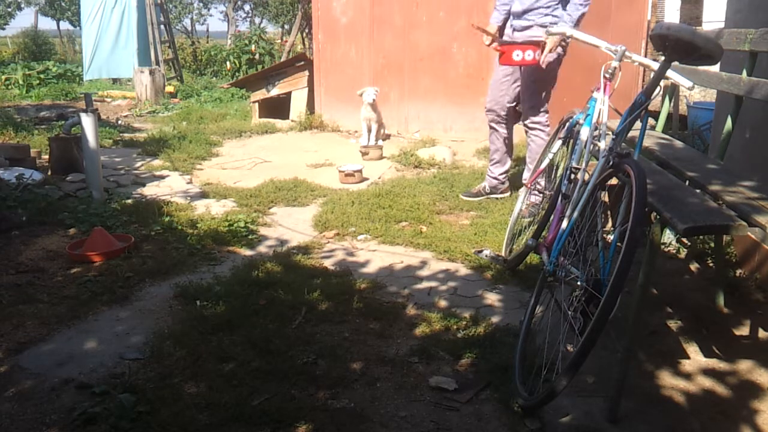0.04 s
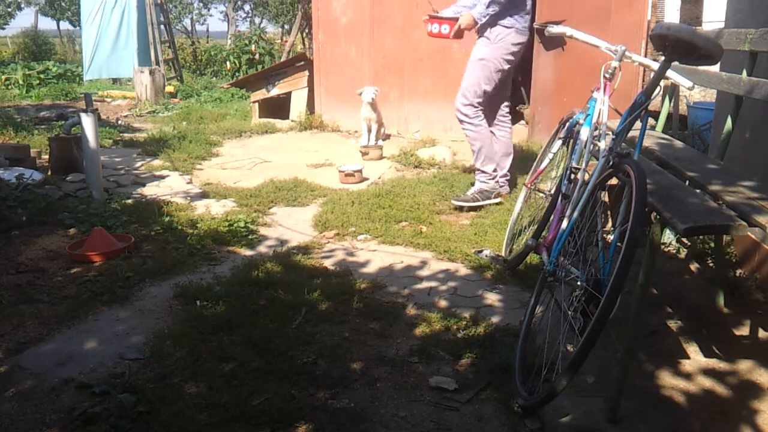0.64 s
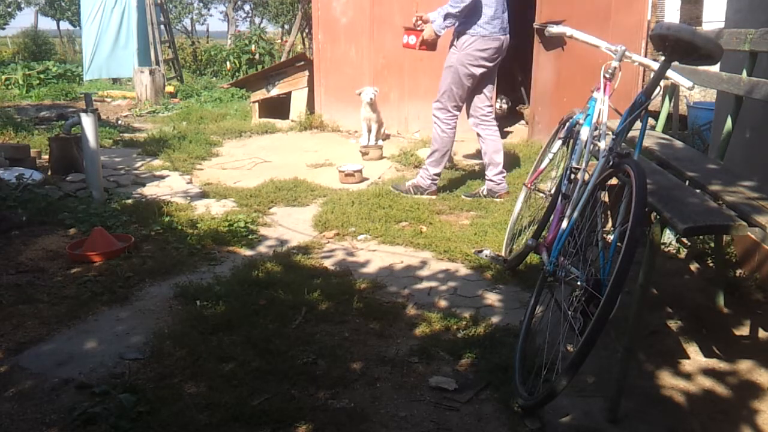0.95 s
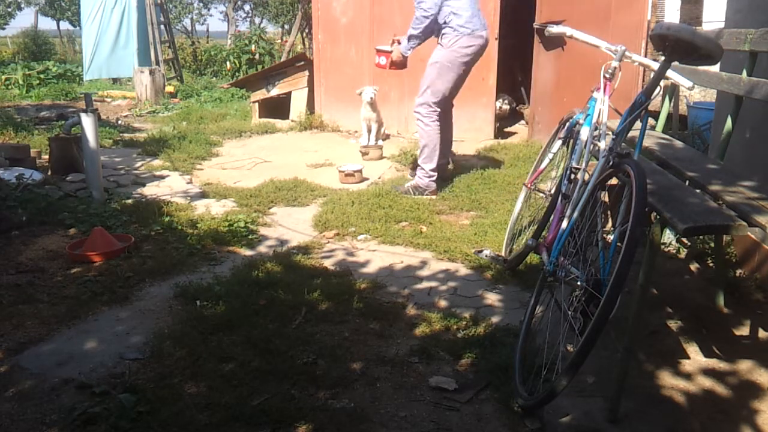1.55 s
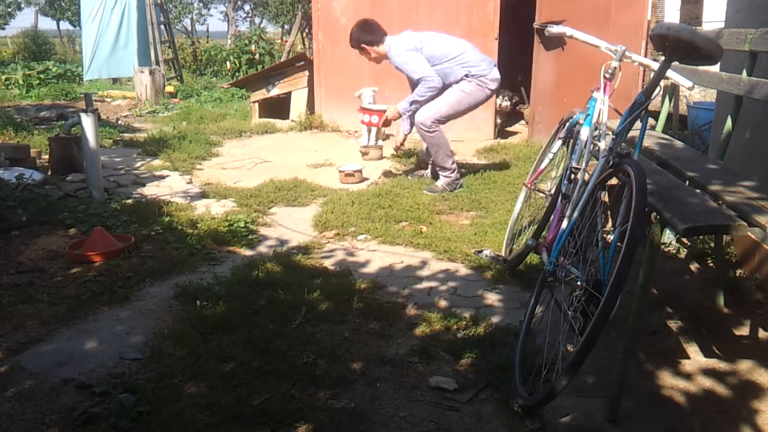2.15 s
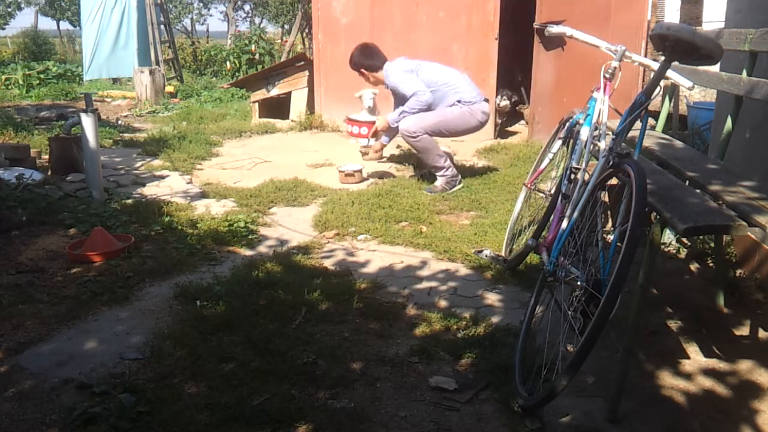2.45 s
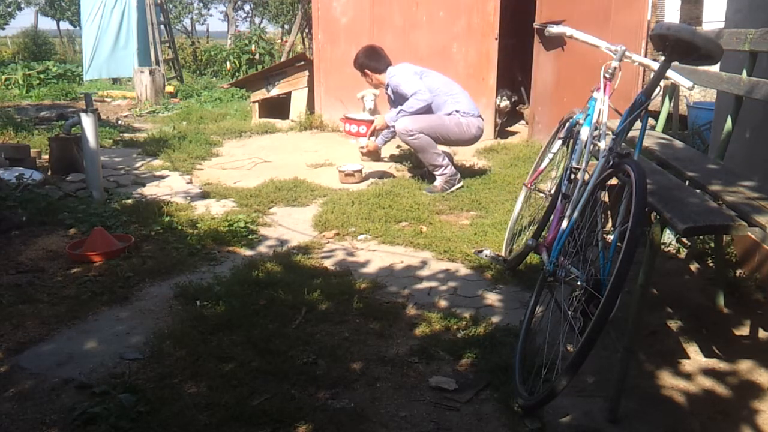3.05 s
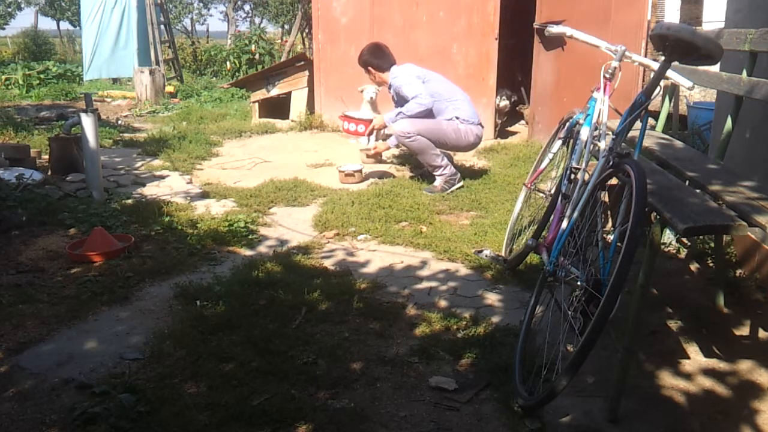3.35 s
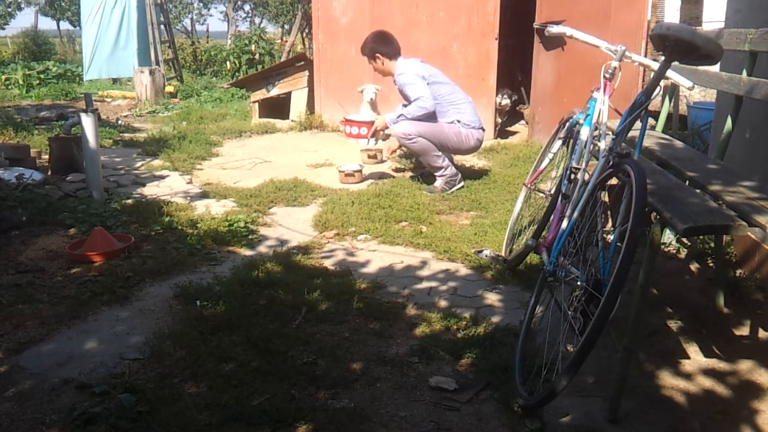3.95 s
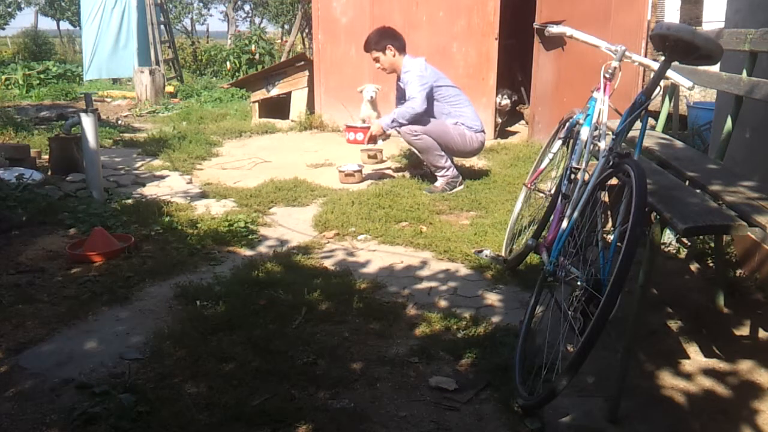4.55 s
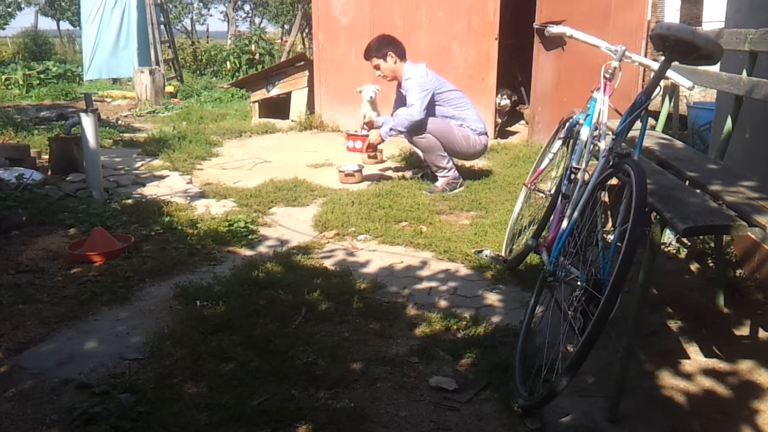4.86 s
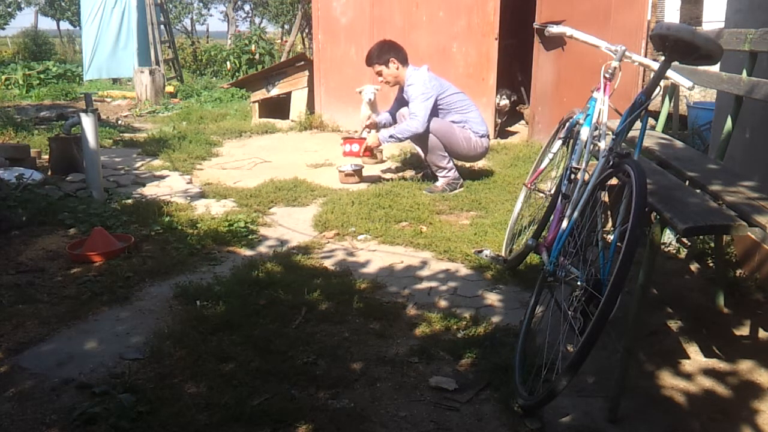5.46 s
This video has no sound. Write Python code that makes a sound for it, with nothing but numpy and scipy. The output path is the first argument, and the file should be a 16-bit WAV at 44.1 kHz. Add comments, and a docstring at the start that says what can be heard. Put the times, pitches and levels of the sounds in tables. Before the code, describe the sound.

An even outdoor hiss fills a quiet yard throughout, with the faint drone of far traffic behind it. At about 1.4 seconds dry pet food clicks a couple of times in a plastic tub, then slides softly until just after 2 seconds; a distant bird gives one thin chirp near 1.7 seconds. At 3 seconds comes the loudest event: the pellets pour into a small bowl for about half a second, a dense patter with hard, crisp knocks that briefly ring the bowl and soft thuds as clumps land on the heap. It is heard from a few metres away, with a slight reflection from a shed wall. From about 4.1 seconds pellets shift quietly in the tub again, and the bird adds two faint high notes. One last small rustle comes near 5 seconds, leaving hiss and traffic until the end, shortly before 6 seconds.

```python
"""Dry pet food is tipped from a plastic tub into a small bowl on the ground of a yard, a few metres away.
Far traffic drones behind an even hiss throughout. From 1.4 s pellets click and slide in the carried tub,
and a far bird chirps. At 3 s the food pours for half a second: a dense patter with hard knocks that ring
the bowl and soft thuds on the heap, thrown back by a shed wall. After 4 s pellets shift in the tub again
and the bird adds two faint notes."""
import sys
import numpy as np
from scipy import signal
from scipy.fft import rfft, irfft
from scipy.io import wavfile

SR = 44100
rng = np.random.default_rng(int(sys.argv[2]) if len(sys.argv) > 2 else 0)


def bounce(signal):
    """Save signal as a 16-bit WAV file at the path given by the first command-line argument."""
    frames = np.transpose(np.atleast_2d(signal))
    limited = np.clip(frames, -1, 1)
    pcm = np.round(limited * 32767).astype(np.int16)
    wavfile.write(sys.argv[1], SR, pcm)


N = 251370
TIME = np.arange(N) / SR
HZ = np.fft.rfftfreq(N, 1 / SR)
RING_TIME = np.arange(SR // 6) / SR

# tone colour of a pellet's crack: f/Hz, level/dB
CRACK_EQ = [(30, -42), (150, -9), (300, -8), (600, 9.5), (1000, 2), (1600, -1.5), (2600, -1.5), (3600, 5),
            (4600, -3), (5700, -5), (8000, -0.5), (10000, -6), (15000, -9.5)]
# modes of the bowl's wall and of its rim: f/Hz, level/dB, t60/s
WALL_MODES = [(1217, -10.5, 0.063), (1357, -17, 0.17), (1496, -4, 0.058), (1549, -1, 0.03),
              (1710, -13, 0.051), (2126, -16.5, 0.14)]
RIM_MODES = [(3380, 2.5, 0.032), (3425, 1, 0.024), (3320, -5, 0.024), (3650, -30, 0.033), (3830, -31, .04),
             (4120, -1.5, 0.017), (4600, 4, 0.025), (6500, -10, 0.051), (6740, -11, 0.062)]


def amp(db):
    """Decibels to gain."""
    return 10 ** (np.asarray(db) / 20)


def unit(x):
    """Scales to rms 1."""
    return x / np.sqrt(np.mean(x ** 2) + 1e-20)


def curve(points, hz):
    """Interpolates breakpoints on a log-frequency axis."""
    f, value = np.transpose(points)
    return np.interp(np.log(hz + 1), np.log(f + 1), value)


def add(mix, s, sound):
    """Mixes a sound into both channels at s seconds."""
    part = mix[:, max(round(s * SR), 0):][:, :sound.shape[-1]]
    part += sound[..., :part.shape[1]]


def colour(x, eq, size=1024):
    """Minimum-phase EQ of unit energy, so that attacks stay sharp."""
    log_gain = np.log(amp(curve(eq, abs(np.fft.fftfreq(size, 1 / SR)))))
    response = np.exp(np.conj(signal.hilbert(log_gain)))
    taps = np.fft.ifft(response).real[:size // 2]
    return signal.fftconvolve(x, taps / np.linalg.norm(taps))[:len(x)]


def drift(rate_hz):
    """Slow random modulation of rms 1."""
    return unit(irfft(rfft(rng.standard_normal(N)) * np.exp(-(HZ / rate_hz) ** 2), N))


def swells(rows):
    """Gain envelope of bell-shaped swells: t/s, half length/s, level/dB."""
    return sum(amp(db) * np.exp(-((TIME - s) / half) ** 2 / 2) for s, half, db in rows)


def humps(rows):
    """A spectrum of resonant peaks."""
    return sum(amp(db) / (1 + ((HZ - hz) / width) ** 2) for hz, width, db in rows)


def burst(life_s):
    """A rough grain chatters on a surface: quick attack, then decay."""
    envelope = RING_TIME / life_s * np.exp(1 - RING_TIME / life_s)
    chatter = envelope * rng.standard_normal(len(RING_TIME))
    return chatter * np.linalg.norm(envelope) / np.linalg.norm(chatter)


def ring(modes, rise_s, detune, spread):
    """Decaying modes; the spot struck shifts their pitch and their phase between left and right."""
    out = np.zeros((2, len(RING_TIME)))
    for hz, db, t60 in modes:
        start, side, shift = rng.uniform(-1, 1, 3)
        phase = start + spread * np.array([[side], [-side]])
        cycles = hz * (1 + detune * shift) * RING_TIME + phase
        out += np.sin(2 * np.pi * cycles) * amp(db - 60 * RING_TIME / t60)
    return out * (1 - np.exp(-(RING_TIME / rise_s) ** 2))


def wash(spectrum, top_hz=14650):
    """A wide stereo bed of diffuse noise with the given spectrum."""
    # likeness of left and right: f/Hz, correlation/0-1
    likeness = [(30, 0), (120, 0.29), (400, 0.32), (800, 0), (1500, 0), (4000, 0.07), (14000, 0)]
    # balance: f/Hz, left over right/dB
    balance = [(30, 5), (80, 5), (170, 1), (400, -2), (1500, -2), (14000, -0.5)]
    left, other = rfft(rng.standard_normal((2, N)))
    same = np.clip(curve(likeness, HZ), 0, 1)
    right = same * left + np.sqrt(1 - same ** 2) * other
    side_db = curve(balance, HZ) / 2
    pair = np.array([left * amp(side_db), right * amp(-side_db)])
    return unit(irfft(pair * spectrum * (HZ < top_hz), N))


def yard(x, near_db, far_db, near_t60=0.063, far_t60=0.46, shadow_hz=900, grass_hz=9000):
    """Direct sound, early scatter from ground and shed wall, and a faint tail."""
    t = np.arange(SR // 2) / SR
    taps = rng.choice([-1., 1.], (2, len(t))) * (rng.random((2, len(t))) < 5000 / SR)
    near = taps * amp(-60 * t / near_t60) * (t > .001)
    far = taps[::-1] * amp(-60 * t / far_t60) * (t > .018)
    near, far = (rfft(e / np.linalg.norm(e, axis=1, keepdims=True), N) for e in (near, far))
    scatter = (HZ / np.hypot(HZ, shadow_hz)) ** 2  # long waves pass small obstacles without scattering
    damping = grass_hz / np.hypot(HZ, grass_hz)  # grass swallows the treble of the reflections
    echoes = damping * (amp(near_db) * scatter * near + amp(far_db) * far)
    # just right of centre: the left side is a touch later and softer
    direct = np.array([np.exp(-2j * np.pi * HZ * .00002), np.ones(len(HZ))])
    return irfft(rfft(x) * (direct + echoes), N) * amp([[-1], [1]])


def air(level_db=-55.5):
    """The even hiss of outdoor air."""
    # tone colour of the air: f/Hz, level/dB
    air_eq = [(15, -40), (25, -36), (43, -11.5), (65, -10.5), (90, -9), (120, -7), (160, -1.5), (320, -11),
              (430, -10.5), (650, -14), (900, -13), (1500, -17.5), (3000, -22), (4300, -23.5), (5800, -27),
              (8000, -25.5), (14500, -26)]
    return wash(amp(curve(air_eq, HZ))) * amp(level_db - 0.07 * drift(11.0))


def traffic_rumble(hold_db=-62.5, full_s=1.73, rise_db_per_s=8.5):
    """The low end of far traffic fades in, holds and swells once."""
    # resonances of the rumble: f/Hz, width/Hz, level/dB
    resonances = [(158, 32, 5), (136, 20, -16.5), (216.4, 6.2, -2)]
    # its swell: t/s, half length/s, level/dB
    swell = [(3.67, 0.089, -60.5)]
    build = amp(hold_db - rise_db_per_s * np.maximum(full_s - TIME, 0))
    return wash(humps(resonances)) * (build + swells(swell))


def tyre_roar(low_db=-69, high_db=-68, flutter_db=1.6):
    """Far tyres roar in two bands that swell as vehicles pass."""
    # resonances of the low and the high band: f/Hz, width/Hz, level/dB
    low_band = [(404, 39, -1.5), (580, 40, 6.5)]
    high_band = [(751, 64, -0.5), (886, 30, -4), (1160, 61, -9)]
    # pass-bys: t/s, half length/s, low band level/dB, high band level/dB
    passes = [(0, 0.15, -71, -69), (1.642, .38, -80, -63.5), (4.0, 0.28, -85, -74), (5.7, .8, -63.5, -64.5)]
    low_gain = amp(low_db) + swells([(s, half, db) for s, half, db, _ in passes])
    high_gain = amp(high_db) + swells([(s, half, db) for s, half, _, db in passes])
    roar = wash(humps(low_band)) * low_gain + wash(humps(high_band)) * high_gain
    return roar * amp(flutter_db * drift(6.1))


def engine(start_hz=85, climb_hz_per_s=3.8, waver=0.012, start_db=-65, fade_db_per_s=1.4, throb_db=1.5):
    """A far engine speeds up evenly: one wavering, throbbing note that fades and swells twice."""
    # swells of the note: t/s, half length/s, level/dB
    engine_swells = [(2.6, 0.3, -69), (5.0, .4, -71.5)]
    pitch_hz = (start_hz + climb_hz_per_s * TIME) * (1 + waver * drift(3.8))
    envelope = amp(start_db - fade_db_per_s * TIME) + swells(engine_swells)
    return np.sin(2 * np.pi * np.cumsum(pitch_hz) / SR) * envelope * amp(-throb_db * drift(7))


def bird(waver=0.0117):
    """A far bird sings a few thin, nearly pure notes."""
    # notes: t/s, half length/s, f/Hz, level/dB
    notes = [(1.736, 0.016, 4300, -67), (4.25, .04, 4500, -79), (4.38, .04, 4500, -74)]
    wobbly_time = np.cumsum(1 + waver * drift(58)) / SR
    return sum(swells([(s, half, db)]) * np.sin(2 * np.pi * hz * wobbly_time) for s, half, hz, db in notes)


def tub(grains_per_s=1500, slide_db=-6, skitter_db=-14):
    """Pellets slide and click in the plastic tub as it is carried and tilted."""
    # tone colour of the rustle: f/Hz, level/dB
    rustle_eq = [(100, 13), (500, 7.5), (1500, 5), (2500, 2), (4300, -0.5), (5800, -0.5), (7000, -1.5),
                 (8500, -3.5), (11000, -4), (15000, -8)]
    # slides: t/s, half length/s, relative level/dB
    slides = [(1.57, 0.052, -64), (1.85, 0.039, -56.5), (1.86, 0.22, -58.5), (4.16, 0.039, -57.5),
              (4.3, 0.14, -61), (5.054, 0.039, -62)]
    # clicks against the tub: t/s, level/dB
    clicks = [(1.361, -46.5), (1.371, -60), (1.533, -44), (1.541, -59), (1.549, -59)]
    # modes of the tub: f/Hz, level/dB, t60/s
    tub_modes = [(1670, -5, 0.031), (3880, -1.5, 0.024), (4670, -5.5, 0.036), (6950, -14, 0.1),
                 (8400, -5, .035)]
    ticks = (rng.random(N) < grains_per_s / SR) * rng.choice([-1, 1], N)
    grains = ticks * amp(-2 * np.minimum(rng.exponential(1, N), 3))
    rustle = unit(colour(grains, rustle_eq)) * swells(slides) * amp(slide_db)
    out = np.tile(rustle, (2, 1))
    for s, db in clicks:
        click = colour(burst(life_s=0.00064) + amp(skitter_db) * burst(life_s=0.015), rustle_eq)
        body = ring(tub_modes, rise_s=0.00028, detune=0.0079, spread=0.17)
        add(out, s, amp(db) * (click + body))
    return out


def slumps():
    """Whole clumps land on the heap with a soft thud."""
    # clumps: t/s, level/dB
    clumps = [(3.037, -31), (3.119, -51), (3.285, -32), (3.384, -34.5), (3.481, -41)]
    # dull modes of the heap: f/Hz, level/dB, t60/s
    heap_modes = [(245, -9.5, 0.059), (362, -5.5, 0.056), (451, 5, 0.036)]
    out = np.zeros((2, N))
    for s, db in clumps:
        add(out, s, amp(db) * ring(heap_modes, rise_s=0.0039, detune=0.062, spread=0.068))
    return out


def floor_modes(pitch_hz):
    """The bowl's floor, tuned to the pitch that the load of food gives it."""
    # modes of the floor: multiple of the pitch, level/dB, t60/s
    partials = [(1, -1.5, 0.052), (.96, -16.5, 0.11), (.55, -23, 0.019), (.77, -12.5, 0.032),
                (1.3, -6, 0.017)]
    return [(pitch_hz * multiple, db, t60) for multiple, db, t60 in partials]


def floor_pitch(s, base_hz=568, lift_hz=68, thick_s=3.19, half_s=0.087):
    """The bowl's floor rings higher in the thick of the pour."""
    return base_hz + lift_hz * np.exp(-((s - thick_s) / half_s) ** 2 / 2)


def flow(start_s, stop_s, hold_db=-42.5, attack_db_per_s=441, release_db_per_s=309):
    """Envelope of the stream: quick attack, a hold with a few surges, slower release."""
    # surges of pellets: t/s, half length/s, level/dB
    surges = [(3.025, 0.033, -43.5), (3.11, 0.0074, -39.5), (3.246, 0.019, -31.5), (3.362, 0.021, -40),
              (3.485, 0.012, -54)]
    early, late = np.maximum(start_s - TIME, 0), np.maximum(TIME - stop_s, 0)
    return amp(hold_db - attack_db_per_s * early - release_db_per_s * late) + swells(surges)


def patter(start_s=2.978, stop_s=3.512, pellets_per_s=1000, pitches=30, spread_db=5.5, trim_db=-7):
    """A stream of small pellets of many pitches lands on the heap and on different spots of the bowl."""
    out = np.zeros((2, N))
    lead_s, tail_s = .06, .12  # room for the attack and the release
    length = round((stop_s - start_s + lead_s + tail_s) * SR)
    for pellet_hz in np.geomspace(1800, 12500, pitches):
        lands = rng.random(SR)[:length] < pellets_per_s / pitches / SR
        size = np.minimum(rng.exponential(1, SR), 3)[:length]
        landings = lands * amp(spread_db * size)
        ping_db = -8 - 10 * np.log10(1 + (pellet_hz / 7000) ** 2)  # small crumbs ping higher and softer
        crack = colour(burst(life_s=0.00028), CRACK_EQ)
        ping = ring([(pellet_hz, 0, .006)], rise_s=0.00026, detune=0.032, spread=0.12)
        grain = crack + amp(ping_db) * ping
        for modes, db in [(floor_modes(pitch_hz=590), -17), (WALL_MODES, -19), (RIM_MODES, -24)]:
            grain += amp(db) * ring(modes, rise_s=0.0012, detune=0.029, spread=0.1)
        add(out, start_s - lead_s, signal.fftconvolve(landings[None], grain, axes=1))
    rms = np.sqrt(np.sum(out ** 2) / (2 * length))
    return out / rms * flow(start_s, stop_s) * amp(trim_db)


def knocks(pellet_hz=3616, scatter_octaves=0.22, ping_t60=0.021, full_hit_db=-23):
    """Hard landings crack, scatter their neighbours, ping and ring the bowl; returns cracks and rings."""
    # hard landings: t/s, hit level/dB, drive of the bowl's floor/dB
    hits = [(2.9484, -47, -41.5), (2.9746, -35, -43), (2.9844, -43, -34.5), (3.0064, -35, -32),
            (3.0306, -33, -38), (3.0381, -29, -33), (3.0526, -32, -41), (3.085, -34, -36),
            (3.1005, -29, -40), (3.1145, -35.5, -21), (3.1458, -22.5, -27), (3.1657, -29, -35),
            (3.1844, -25.5, -24.5), (3.2086, -22, -29.5), (3.234, -21.5, -22), (3.281, -33, -22.5),
            (3.3255, -29.5, -33), (3.3493, -29, -37), (3.3551, -27, -45), (3.3694, -33.5, -32),
            (3.3855, -29.5, -47), (3.4185, -23, -40), (3.4284, -47, -33), (3.4545, -25, -52),
            (3.457, -28.5, -27), (3.482, -27.5, -33.5), (3.5054, -36, -33.5)]
    # brittle pellets that snap as they land: t/s, level/dB
    snaps = [(3.2088, -15), (3.235, -20.5)]
    # tone colour of a snap: f/Hz, level/dB
    snap_eq = [(100, -35), (3000, -31), (8000, -4), (10500, 4), (11700, 22), (12800, 2), (15000, -1)]
    cracks, rings = np.zeros((2, 2, N))
    for s, hit_db, floor_db in hits:
        add(cracks, s, amp(hit_db - 1) * colour(burst(life_s=0.00036), CRACK_EQ))
        add(cracks, s, amp(hit_db - 15) * colour(burst(life_s=0.00075), snap_eq))
        skitter = colour(burst(life_s=0.007), CRACK_EQ)
        add(rings, s, amp(hit_db - 17) * skitter)
        ping_hz = pellet_hz * 2 ** (scatter_octaves * rng.uniform(-1.05, 1))
        ping_modes = [(ping_hz, 0, ping_t60), (ping_hz * 1.5, -6, ping_t60)]
        add(rings, s, amp(hit_db - 4) * ring(ping_modes, rise_s=0.00028, detune=0.0046, spread=0.029))
        # the heavy floor answers later than wall and rim
        floor = ring(floor_modes(floor_pitch(s)), rise_s=0.0038, detune=0.024, spread=0.053)
        add(rings, s, amp(floor_db + 5.5) * floor)
        # the wall follows both the hit and the floor
        wall_db = -22 + 0.96 * (hit_db - full_hit_db) + 0.84 * (floor_db - full_hit_db)
        add(rings, s, amp(wall_db) * ring(WALL_MODES, rise_s=0.00038, detune=0.032, spread=0.17))
        add(rings, s, amp(hit_db - 12) * ring(RIM_MODES, rise_s=0.00092, detune=0.039, spread=0.08))
    for s, db in snaps:
        add(cracks, s, amp(db) * colour(burst(life_s=0.0006), snap_eq))
    return cracks, rings


def scene():
    """The food over the outdoor bed; pellets deep in the bowl or tub are heard mostly by reflection."""
    cracks, rings = knocks()
    close_cracks = yard(cracks, near_db=-8, far_db=-22)  # driest: the top of the heap is in plain view
    landings = yard(rings + slumps(), near_db=-2.5, far_db=-12)
    stream = yard(patter(), near_db=6.0, far_db=-17)
    tub_and_bird = yard(tub() + bird(), near_db=1.5, far_db=-21)
    bed = air() + traffic_rumble() + tyre_roar() + engine()
    return bed + tub_and_bird + stream + landings + close_cracks


def record(dry):
    """A steep low-pass at 15 kHz on the whole mix."""
    lowpass = signal.firwin(255, 15000, window=("kaiser", 8), fs=SR)
    return signal.oaconvolve(dry, lowpass[None], "same")


dry = scene()
out = record(dry)
bounce(out)
```